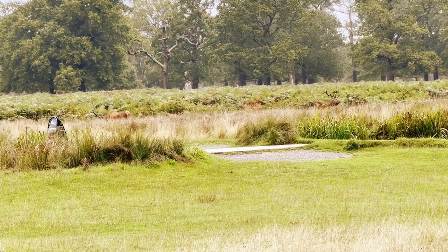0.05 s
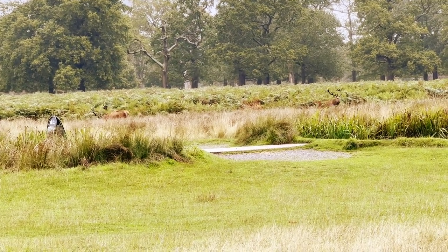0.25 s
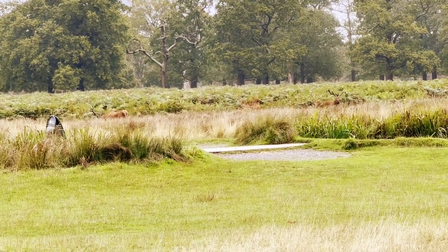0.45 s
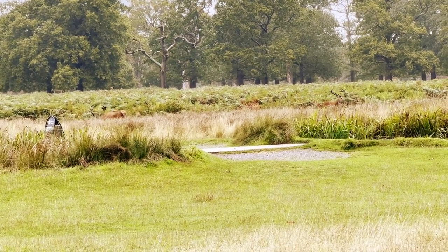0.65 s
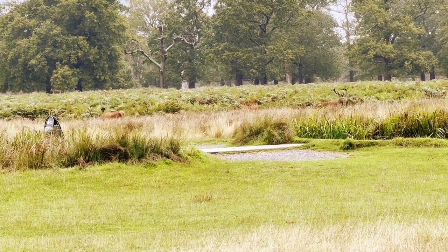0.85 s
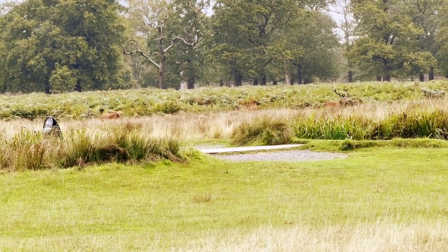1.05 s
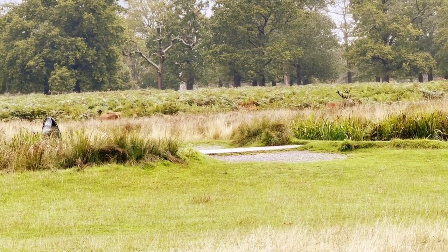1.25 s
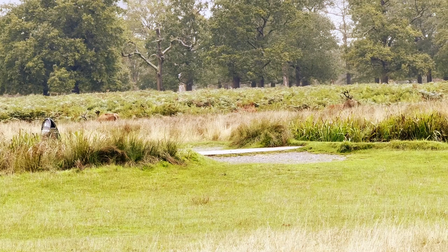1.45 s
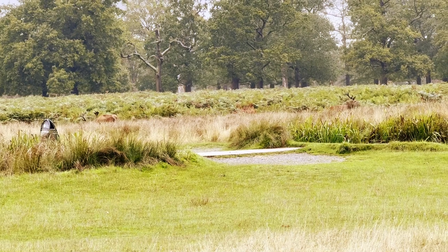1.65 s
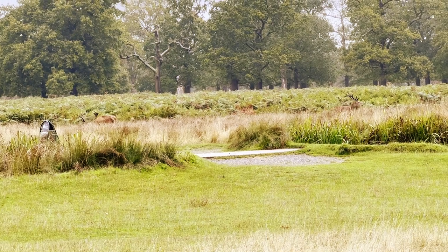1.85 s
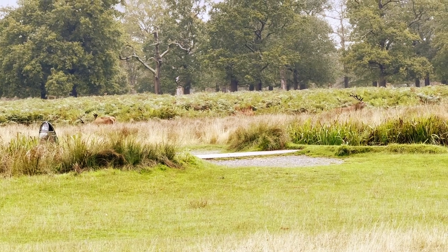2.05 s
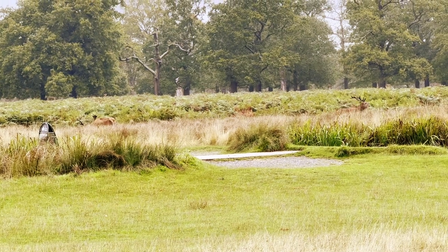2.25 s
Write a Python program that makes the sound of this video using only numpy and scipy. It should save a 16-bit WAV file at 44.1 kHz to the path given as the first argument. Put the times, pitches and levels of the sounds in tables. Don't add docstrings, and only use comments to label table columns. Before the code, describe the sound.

Wind buffets an outdoor stereo microphone with deep, uneven rumbling early on, then a brief after-gust and near silence, where far stags roar very faintly, birds whistle and churr among echoing trees, and jackdaws hoot briefly at left.

```python
import sys
import numpy as np
from scipy import signal
from scipy.fft import rfft, irfft, next_fast_len
from scipy.io import wavfile
from scipy.ndimage import uniform_filter1d

SR = 44100
rng = np.random.default_rng(int(sys.argv[2]) if len(sys.argv) > 2 else 0)


def materialize(psi):
    bounded = np.clip(np.atleast_2d(psi).T, -1, 1)
    quanta = np.round(bounded * 32767).astype(np.int16)
    wavfile.write(sys.argv[1], SR, quanta)


def gain_from_db(level_db):
    decades = np.asarray(level_db, float) / 20
    return 10 ** decades


N = 101430
T_S = np.arange(N) / SR
WIDE = np.array([[1], [-1]])


def curve(table, col=1):
    rows = np.array(table, float)
    return np.interp(T_S, rows[:, 0], rows[:, col])


def unit(x):
    return x / np.sqrt(np.mean(x ** 2))


def smooth(x, span):
    return uniform_filter1d(uniform_filter1d(x, span), span)


def walk(rate_hz):
    return unit(smooth(rng.standard_normal(N), int(SR / rate_hz)))


def coloured(points, flicker_db, quick_db):
    rows = np.array(points, float)
    log_hz = np.log(np.fft.rfftfreq(N, 1 / SR) + 1)
    edge = np.log(rows[:, 0])
    db = np.interp(log_hz, edge, rows[:, 1])
    db = db - 40 * np.maximum(edge[0] - log_hz, 0) - 30 * np.maximum(log_hz - edge[-1], 0)
    full = rfft(rng.standard_normal(N)) * gain_from_db(db)
    out = 0
    step = np.log(2) / 2
    for mid in np.arange(6, 30) * step:
        if not edge[0] - 1 < mid < edge[-1] + .5:
            continue
        share = np.cos(np.pi / 2 * np.clip((log_hz - mid) / step, -1, 1)) ** 2
        out = out + irfft(full * share, N) * gain_from_db(flicker_db * walk(1.2) + quick_db * walk(11))
    return unit(out)


def pan(x, pan_db):
    return x * gain_from_db(np.array([[pan_db], [-pan_db]]) / 2)


def swell(start_s, length_s):
    return np.sin(np.pi * np.clip((T_S - start_s) / length_s, 0, 1))


def turned(x):
    return np.imag(signal.hilbert(x, next_fast_len(N)))[:N]


def band(x, low_hz, high_hz):
    return signal.sosfilt(signal.butter(2, [low_hz, high_hz], "bandpass", fs=SR, output="sos"), x)


def glide_phase(hz):
    return 2 * np.pi * np.cumsum(hz) / SR


def calls(table, rough):
    out = 0
    waver = rough * walk(500)
    for s, d, from_hz, to_hz, db in table:
        left = np.clip(1 - (T_S - s) / d, 0, 1) ** 1.7
        hz = to_hz + (from_hz - to_hz) * left
        own_waver = np.roll(waver, int(from_hz))
        out = out + 2 * gain_from_db(db) * swell(s, d) * np.sin(glide_phase(hz * (1 + own_waver)))
    return out


def trees(x, t60_s):
    t = np.arange(SR) / SR
    both, apart = rng.standard_normal((2, SR))
    tail = (both + 0.25 * apart * WIDE) * gain_from_db(-60 * t / t60_s) * np.minimum(t / 0.027, 1)
    tail = tail / np.sqrt(np.sum(tail ** 2, axis=1, keepdims=True))
    return x + gain_from_db(-5.5) * signal.fftconvolve(x, tail, axes=1)[:, :N]


# t/s, peak level/dB, length/s, push + or pull - [ratio]
AIR_SLAPS = [
    (0, -41.5, 0.0036, -0.96),
    (0.832, -24.5, 0.0033, 0.84),
    (0.858, -40, 0.0017, -1.2),
    (1.306, -52, 0.0046, 0.73),
    (1.752, -42.5, 0.0027, 0.63),
    (2.204, -47, 0.0023, 1),
]


def slaps():
    out = 0
    for s, db, d, way in AIR_SLAPS:
        x = (T_S - s) / d
        out = out + way * gain_from_db(db) * (1 - x ** 2) * np.exp(-x ** 2 / 2)
    return out


# peak t/s, level/dB, half length/s
WIND_PUFFS = [(1.021, -54.5, .03), (1.156, -53.5, 0.046), (1.211, -59, 0.033), (1.315, -53, 0.018),
              (1.502, -58.5, 0.048), (1.759, -53.5, 0.018), (1.869, -43.5, .02), (1.985, -54, 0.036),
              (2.064, -53, 0.016), (.01, -50.5, 0.05), (.95, -53, .04)]


def puffs(low):
    return unit(low) * sum(gain_from_db(db) * swell(s - d, 2 * d) for s, db, d in WIND_PUFFS)


# f/Hz, level/dB per Hz
AIR_COLOUR = [(25, -18.5), (60, -2.5), (200, -9), (460, -16.5), (1000, -26.5), (1400, -34), (2400, -41),
              (4800, -70.5)]
# f/Hz, level/dB per Hz
AIR_SIDE_COLOUR = [(25, -12), (66, -2), (227, -15), (763, -10.5), (1700, -29.5), (2600, -53.5), (4400, -59),
                   (5200, -75.5)]


def distant_air():
    air = gain_from_db(-56.5) * coloured(AIR_COLOUR, 0.48, 1.4)
    lag = gain_from_db(-12) * band(turned(air), 400, 1500)
    lean = gain_from_db(-9.5) * band(air, 380, 800)
    loose = gain_from_db(-66.5) * coloured(AIR_SIDE_COLOUR, 1.2, 1.6)
    return air + WIDE * (lean + loose + lag)


# f/Hz, level/dB per Hz
HISS_COLOUR = [(3000, -3.5), (5000, -0.5), (7400, -1), (8000, -18), (9300, -13), (9900, -8.5), (13000, -8),
               (15600, -6)]


def microphone_hiss():
    side_colour = [(6500, -33), (7100, 8), (10000, 5.5), (13200, 5), (14200, -23.5)]
    side = gain_from_db(-96.5) * coloured(side_colour, .3, 0.58)
    return gain_from_db(-91.5) * coloured(HISS_COLOUR, .1, .2) + WIDE * side


# t/s, length/s, f/Hz, level/dB
STAGS_LEFT = [
    (.08, 0.3, 510, -68.5),
    (.4, .36, 500.7, -66.5),
    (.82, 0.064, 503, -59),
    (.9, 0.39, 507, -70),
    (1.22, 0.16, 503, -70),
    (1.45, 0.26, 500, -70.5),
    (.08, 0.18, 355, -64.5),
    (.83, 0.045, 716, -65),
]
# t/s, length/s, f/Hz, level/dB
STAGS_WIDE = [
    (0, 0.27, 665, -71.5),
    (.26, .18, 665, -70.5),
    (1.08, 0.56, 637, -76),
    (1.75, 0.11, 655, -80),
]


def roars(table):
    out = 0
    for s, d, hz, db in table:
        phase = glide_phase(hz * (1 + 0.0086 * walk(45)))
        out = out + np.sqrt(2 * swell(s, d)) * gain_from_db(db + 1.5 * walk(25)) * np.sin(phase)
    return out


def stags():
    return pan(roars(STAGS_LEFT), 5.5) + WIDE * roars(STAGS_WIDE)


# t/s, length/s, from f/Hz, to f/Hz, level/dB
WHISTLES = [(.093, .07, 4150, 3680, -71), (.418, .075, 4250, 3670, -70), (.55, .16, 2780, 2220, -79),
            (.225, .06, 4640, 4600, -91), (.88, .055, 2300, 2200, -79), (.37, .05, 1700, 1450, -77),
            (2.035, .055, 4650, 4550, -90), (2.25, .03, 2400, 2100, -77), (.38, .12, 2500, 1760, -83),
            (.15, .035, 3750, 2900, -87), (.5, .07, 2770, 2760, -88), (.06, .06, 2450, 1950, -84)]
# t/s, length/s, from f/Hz, to f/Hz, level/dB
FAR_WHISTLES = [(.33, .045, 3200, 3700, -81), (.765, .06, 3100, 2700, -82), (1.42, .04, 4250, 3650, -78),
                (1.085, .1, 3200, 1900, -84), (1.33, .03, 2450, 2300, -80), (1.53, .04, 2550, 2200, -80),
                (1.755, .035, 3400, 2900, -82), (1.82, .11, 2550, 1900, -83), (1.4, .04, 4650, 4250, -86),
                (2.015, .03, 2400, 2300, -82), (1.6, .04, 1950, 1850, -79), (1.44, .03, 1650, 1550, -78),
                (.39, .04, 4900, 4300, -90), (.32, .04, 1500, 1850, -81), (1.21, .04, 3800, 3700, -90),
                (1.71, .03, 2400, 2250, -83)]
# t/s, length/s, from f/Hz, to f/Hz, level/dB
HARSH_CALLS = [(2.0, .18, 2700, 4100, -82), (1.98, .14, 2900, 3100, -80), (2.0, .12, 2200, 2600, -85),
               (.55, .18, 3800, 3400, -88), (1.93, .2, 3700, 3800, -87), (1.41, .07, 4400, 3700, -82),
               (.76, .1, 3500, 3300, -86), (1.45, .33, 2300, 2100, -83), (1.45, .3, 3400, 2900, -83),
               (1.72, .14, 3300, 3000, -87), (1.1, .2, 2600, 2200, -86), (2.15, .15, 3400, 3400, -89),
               (1.3, .12, 3700, 3600, -89), (.92, .12, 3800, 3700, -89), (0, .09, 3900, 3800, -87)]


def far_birds():
    whistles = gain_from_db(-0.46) * (calls(WHISTLES, .011) + calls(FAR_WHISTLES, .035))
    far = whistles + gain_from_db(-3.87) * calls(HARSH_CALLS, .08)
    far = far + WIDE * gain_from_db(-13.5) * turned(far)
    return trees(far, .85)


# t/s, level/dB
GUSTS = [
    [(0.12, -51), (0.208, -45.5), (0.225, -31), (0.258, -15), (0.308, -17), (0.334, -29.5), (0.372, -14),
     (0.64, -23), (0.685, -24.5)],
    [(0.72, -43.5), (0.76, -18), (0.788, -25.5), (0.812, -43.5), (0.84, -41), (0.868, -37), (0.888, -48.5),
     (0.91, -47), (1.0, -71.5)],
]
GUST_FULL_DB = -14


def gust_level_db():
    return uniform_filter1d(curve([(.05, -67.5)] + list(GUSTS[0]) + list(GUSTS[1])), size=300)


# t/s, f/Hz, overtone level/dB, turbulence level/dB
SHEDDING = [(.23, 78.08, -2, -6), (.26, 85.63, 1.5, -1), (.285, 76.47, 1.5, -5), (.31, 61.8, 3.5, -3.5),
            (.335, 78.8, 0, 1), (.368, 78.2, -2, -2), (.385, 67.5, -1, -6.5), (.41, 79.14, 2.5, -3),
            (.44, 90.1, 4, 0), (.475, 82.5, -5, -3), (.52, 77.06, -2, -6.5), (.548, 58.16, -2, -1.5),
            (.59, 58.13, -1.5, 0.5), (.63, 59.9, -3.5, -0.5), (.68, 47.54, -5.5, -2),
            (.735, 102.3, -6.5, -3), (.763, 86.7, -3.5, -6.5), (.8, 66, -3.5, 8)]
# multiple of shedding f [ratio], level/dB
EDDY_OVERTONES = [(1, 1.5), (2, -13), (3, -23.5), (4, -37)]
# t/s, length/s, f/Hz, level/dB re first edge
SECOND_EDGE = [
    (.52, .14, 97, 0.5),
    (0.48, .025, 150, -3.5),
    (0.33, .04, 130, -4.5),
    (.765, 0.056, 150, -10),
    (0.49, 0.022, 170, -7),
    (0.63, .04, 130, -10),
    (.245, .045, 225, -17.5),
]


def eddies(gust_db):
    phase = glide_phase(curve(SHEDDING) * (1 + .03 * walk(33)))
    over_db = 0.24 * (gust_db - GUST_FULL_DB) + curve(SHEDDING, col=2)
    out = 0
    for k, db in EDDY_OVERTONES:
        wobble_db = 2.5 * min(k - .7, 1) * walk(25)
        out = out + gain_from_db(db + (k - 1.5) * over_db + wobble_db) * np.sin(k * phase)
    for s, d, hz, db in SECOND_EDGE:
        out = out + gain_from_db(db) * swell(s, d) * np.sin(2 * np.pi * hz * (T_S - s))
    return unit(out)


# f/Hz, level/dB per Hz
TURBULENCE = [(25, -30), (40, -15), (58, -3), (100, 0), (170, -11), (210, -20), (260, -29), (420, -48)]


def turbulence(gust_db):
    db = -10.5 + curve(SHEDDING, col=3) - .45 * (gust_db - GUST_FULL_DB)
    return gain_from_db(db) * coloured(TURBULENCE, 0.57, 3.1)


def buffet():
    gust_db = gust_level_db()
    gust = gain_from_db(gust_db)
    mid = eddies(gust_db) + turbulence(gust_db)
    power = smooth(mid ** 2, int(.04 * SR))
    mid = gust * mid / power ** (.8 / 2)
    puff_hz, puff_width_hz, port_top_hz = 65.7, 65, 543
    low = signal.lfilter(*signal.iirpeak(puff_hz, puff_hz / puff_width_hz, SR), coloured(TURBULENCE, 0.8, 0.95))
    mid = signal.sosfiltfilt(signal.butter(4, port_top_hz, fs=SR, output="sos"), mid + puffs(low))
    mid = mid + slaps()
    side = gain_from_db(-10.5) * (turned(mid) + 0.16 * low * gust)
    return mid + WIDE * side


# t/s, length/s, from f/Hz, to f/Hz, level/dB
NEAR_TSEEPS = [
    (.537, .012, 6000, 7600, -83),
    (.812, .015, 6400, 7400, -85),
    (.815, .05, 5700, 5700, -92),
    (.82, .055, 7000, 6600, -89),
    (.545, .05, 6500, 6800, -89),
]
# t/s, length/s, from f/Hz, to f/Hz, level/dB
PURE_TSEEP = [
    (.55, .08, 7100, 7000, -84),
]


def tseeps():
    near = calls(NEAR_TSEEPS, .04) + calls(PURE_TSEEP, .011 / 2)
    return gain_from_db(0.5) * trees(pan(near, 4.5), .2)


# t/s, length/s, from f/Hz, to f/Hz, level/dB
JACKDAWS = [
    (1.365, .055, 740, 785, -64),
    (2.205, .025, 700, 860, -62),
    (2.218, .027, 820, 1010, -64),
]
# t/s, length/s, from f/Hz, to f/Hz, level/dB
LEFT_JACKDAW = [
    (.86, 0.068, 1150, 1125, -67),
]


def jackdaws():
    left = calls(LEFT_JACKDAW, .011) * np.array([[1.5], [-.55]])
    return pan(calls(JACKDAWS, .011), 6.5) + left


def scene():
    return buffet() + distant_air() + microphone_hiss() + stags() + far_birds() + tseeps() + jackdaws()


def converter_image(dry):
    carrier_hz = 9600
    image = gain_from_db(-63.5) * np.mean(dry, axis=0) * np.cos(2 * np.pi * carrier_hz * T_S)
    return image * np.array([[1.15], [.85]])


def low_pass(x):
    return signal.sosfilt(signal.butter(12, 15690, fs=SR, output="sos"), x)


def record(dry):
    return low_pass(dry + converter_image(dry))


dry = scene()
out = record(dry)
materialize(out)
```